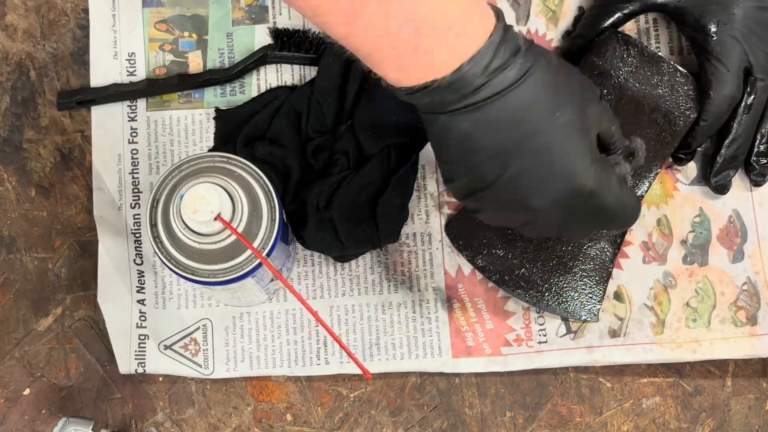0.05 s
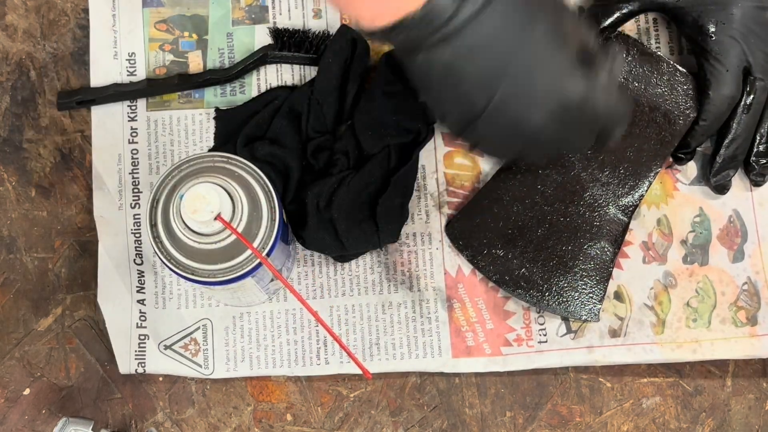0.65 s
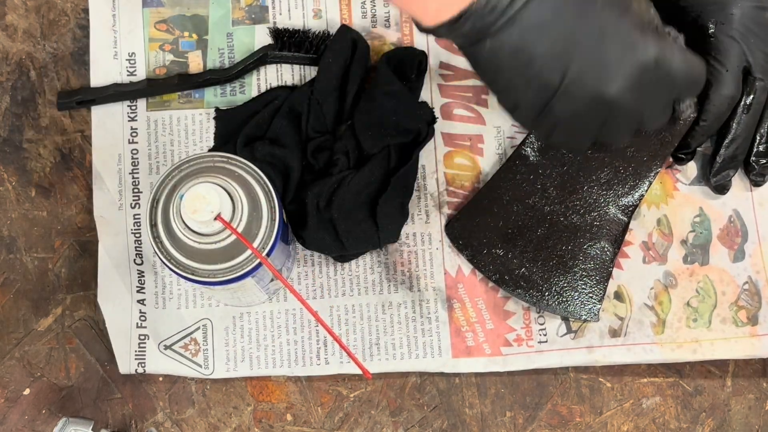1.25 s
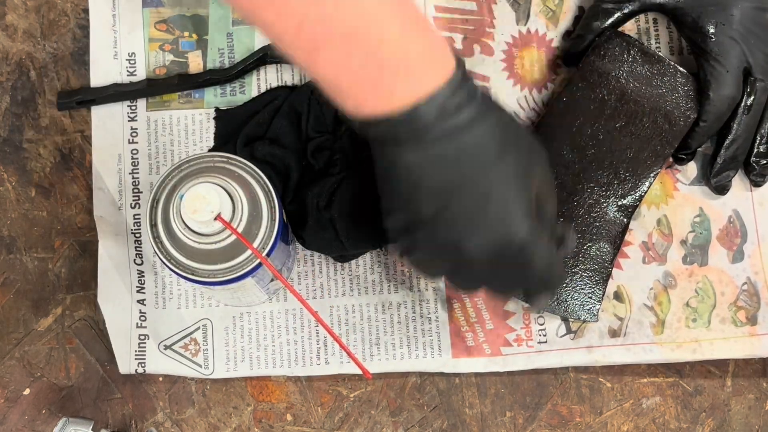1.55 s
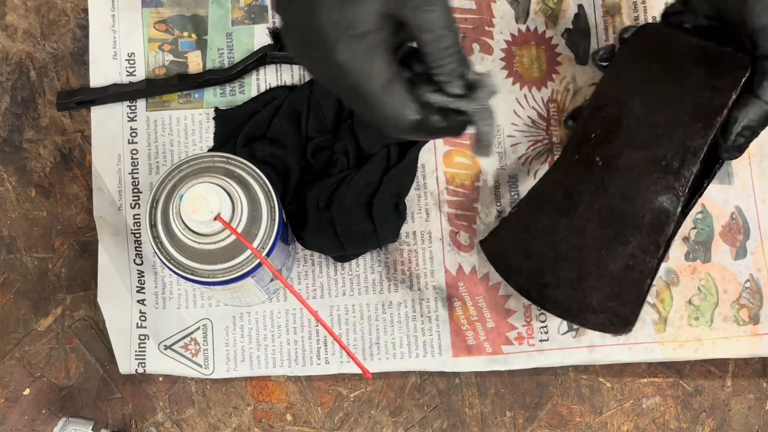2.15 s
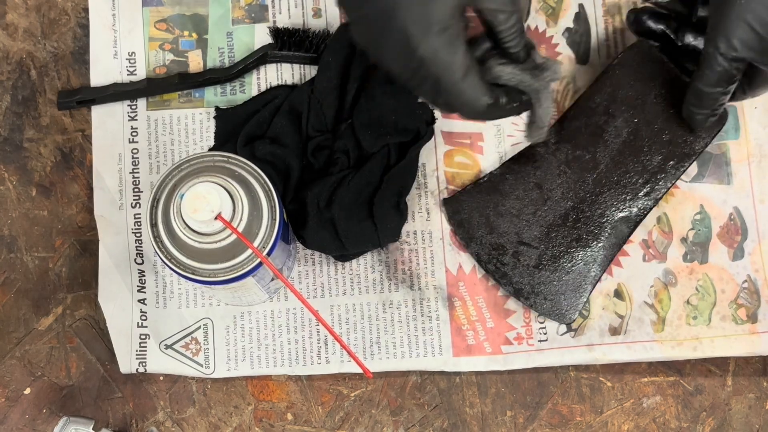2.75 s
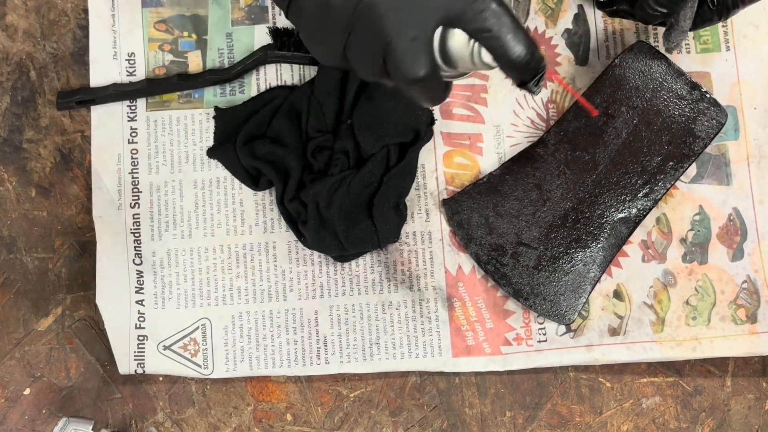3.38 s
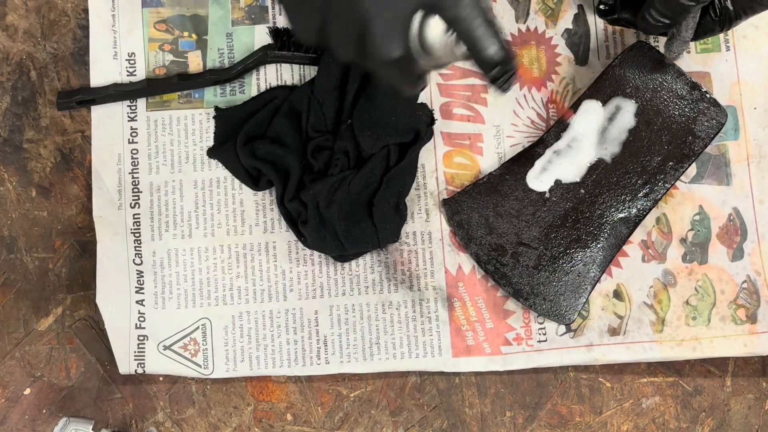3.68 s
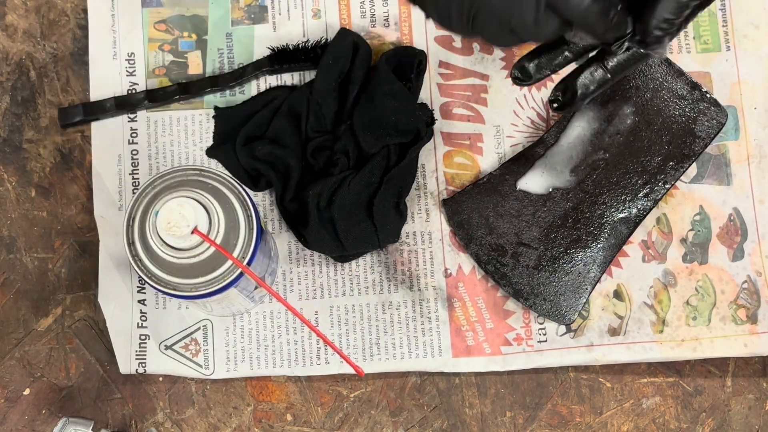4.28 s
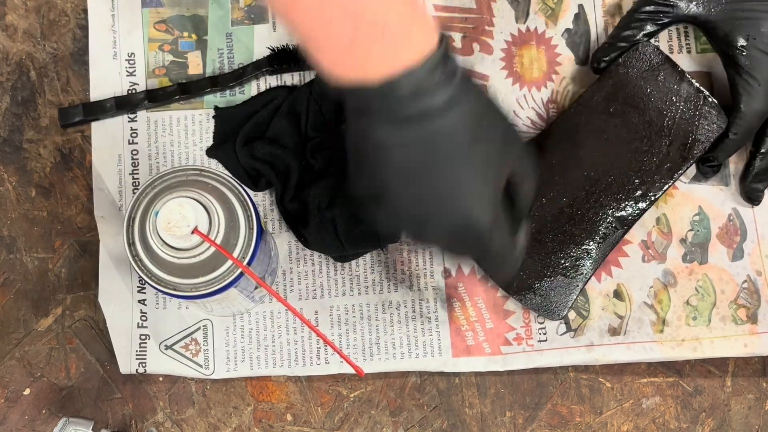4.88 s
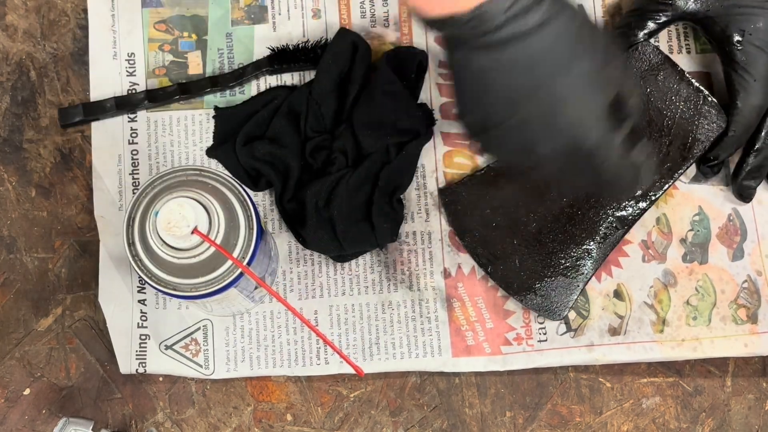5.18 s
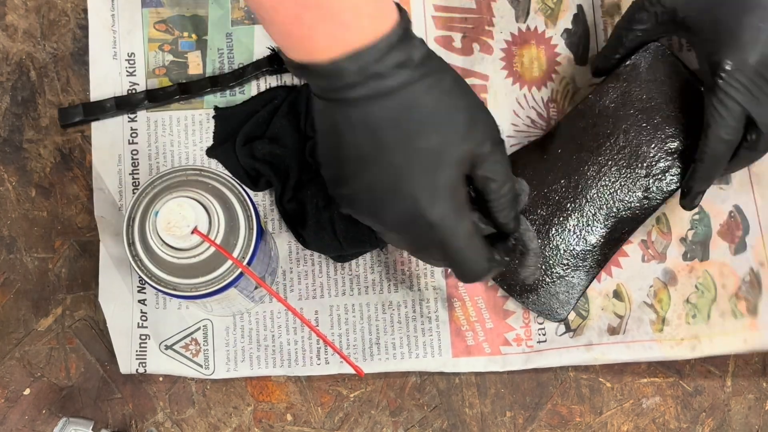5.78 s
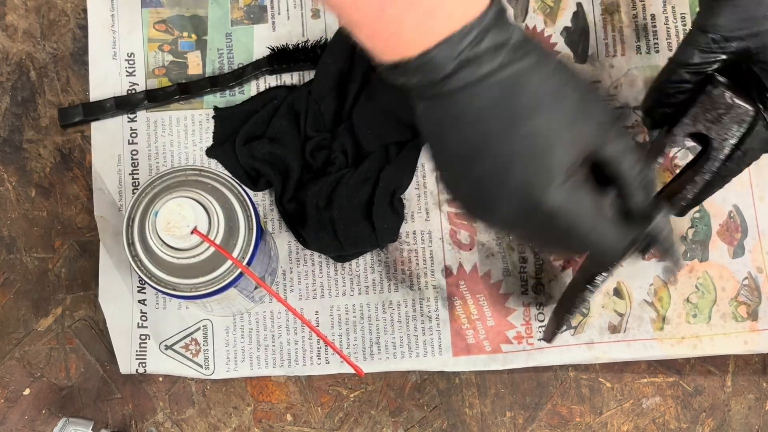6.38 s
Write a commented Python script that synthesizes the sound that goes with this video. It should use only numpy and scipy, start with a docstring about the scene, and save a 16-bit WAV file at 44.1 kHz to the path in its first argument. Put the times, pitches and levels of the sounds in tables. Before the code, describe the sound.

Close by, in a small workshop with a humming fan, a cloth rubs rapidly back and forth over oily steel. Newspaper and gloves rustle, and the axe head bumps on the wooden bench as it is turned over. Midway, a spray can gives one short, spluttering hiss and is put down. More brisk rubbing follows, with a few dull knocks, fading to faint wipes.

```python
"""A rag scrubs an oily steel axe head on newspaper on a wooden bench: stick-slip friction makes a hiss
that follows each stroke and faintly excites the steel's modes. Gloves tick and crinkle. The head scrapes
over the paper and is turned over, each impact ringing the bench. A spray can is lifted, squirts foam in
a turbulent jet and is set down; the scrubbing goes on. A small workshop rumbles and a fan hums."""
import sys
import numpy as np
from scipy import signal
from scipy.fft import rfft, irfft
from scipy.io import wavfile
from scipy.ndimage import uniform_filter1d, map_coordinates

SR = 44100
rng = np.random.default_rng(int(sys.argv[2]) if len(sys.argv) > 2 else 0)


def unload_wav(signal):
    """Save mono or channel-first audio to the path in sys.argv[1] as 16-bit WAV at rate SR, clipped to [-1, 1]."""
    wavfile.write(
        sys.argv[1],
        SR,
        np.round(np.clip(np.atleast_2d(signal).T, -1, 1) * 32767).astype(np.int16),
    )


N = 292383
TIME = np.arange(N) / SR
BINS = np.fft.rfftfreq(N, 1 / SR)
TURNED_S, VALVE_SHUT_S = 2.36, 3.645  # the head is turned over; the squirt is released

# impacts of axe head and can: (time [s], force level [dB], contact hardness [Hz], low cutoff [Hz])
AXE_IMPACTS = [(1.906, -16, 162, 91), (2.061, -28, 770, 400), (2.077, -24.5, 724, 393),
               (2.3635, 0.5, 622, 210), (2.65, -20.5, 195, 90), (2.7345, -2.5, 373, 120),
               (2.7651, -2, 241, 284), (4.6361, -5, 344, 238), (4.814, -10, 363, 141),
               (5.2844, -18.5, 312, 50), (5.555, -16, 330, 154), (5.865, -21, 190, 131)]
CAN_IMPACTS = [(3.757, -32.5, 1810, 680), (3.773, -44, 1600, 600), (3.9268, -10, 760, 290),
               (3.937, -36, 450, 250)]
# spectra of coarse friction and of fine crinkling: (frequency [Hz], relative level [dB])
DRAG_SPECTRUM = [(300, 0.5), (900, -9.5), (1500, 1), (2100, -3), (2600, -2), (3100, 1), (3600, 1.5),
                 (4400, -2.5), (5600, -3.5), (8000, -4), (16000, -31)]
CRINKLE_SPECTRUM = [(1000, -30), (3500, -1.5), (6500, 1), (9000, 2), (12000, 0.5), (16000, -1.5)]


def amp(db):
    """Amplitude ratio of a level in decibels."""
    return 10 ** (np.asarray(db) / 20)


def unit(x):
    """Normalisation to rms 1."""
    return x / np.sqrt(np.mean(x ** 2) + 1e-20)


def read(points, hz):
    """Interpolation on a log-frequency axis."""
    f, value = np.transpose(points)
    return np.interp(np.log(hz + 1), np.log(f + 1), value)


def add(mix, s, sound):
    """Superposition of a sound on the mix at time s."""
    at = round(s * SR)
    sound = sound[max(-at, 0):]
    part = mix[max(at, 0):][:len(sound)]
    part += sound[:len(part)]


def colour(x, spectrum):
    """Spectral shaping, at rms 1."""
    return unit(irfft(rfft(x) * amp(read(spectrum, BINS)), N))


def drift(hz):
    """Random fluctuation: low-pass noise of rms 1."""
    return unit(irfft(rfft(rng.standard_normal(N)) / (1 + (BINS / hz) ** 4), N))


def grains(per_s, spread_db):
    """Shot noise: a Poisson train of impulses of random size."""
    size = amp(spread_db * np.minimum(rng.exponential(1, N), 5))
    return unit(rng.standard_normal(N) * size * (rng.random(N) < per_s / SR))


def place(x, left_db):
    """Direction by a level difference between the channels."""
    return x * amp(np.array([[left_db], [-left_db]]) / 2)


def swing(length_s):
    """Reciprocating motion: the hand is fastest near mid-stroke and slowest at the turns."""
    u = np.linspace(0, 1, max(round(length_s * SR), 8))
    return unit(0.19 + abs(np.sin(np.pi * u ** 0.99)) ** 1.13)


def surface_db(s):
    """Lubrication sets the drag at time s: the wiped side, then the drier side, then fresh oil."""
    wiped_db, dry_db, oiled_db = 0, 4.5, -3
    return oiled_db if s > VALVE_SHUT_S else dry_db if s > TURNED_S else wiped_db


def strokes():
    """Friction envelopes: hiss follows the hand's speed, and drag grows as a weaker power of it."""
    # runs of equal strokes: (start [s], end [s], strokes [count], hiss level [dB], swell over run [dB])
    runs = [(-0.045, 0.15, 3, -53.5, 2), (0.149, 0.782, 10, -57, -2), (0.782, 1.196, 5, -56, 3),
            (1.2, 1.278, 1, -48, 0), (1.281, 1.414, 1, -47.5, 1), (1.417, 1.563, 2, -48, -4.5),
            (1.56, 1.799, 3, -54.5, 1.5), (1.801, 1.968, 2, -54, -5.5), (2.383, 2.563, 2, -49, 7),
            (2.605, 2.677, 1, -56.5, -5), (4.484, 4.696, 2, -52, 1.5), (4.705, 5.128, 5, -50, 6),
            (5.123, 5.195, 1, -57, 3), (5.191, 5.451, 4, -52, -1), (5.451, 5.687, 3, -49.5, 1.5),
            (5.68, 5.955, 2, -53.5, -12.5), (6.042, 6.16, 2, -64, -1), (6.37, 6.46, 1, -62.5, 0),
            (6.568, 6.63, 1, -65, -1)]
    easy_hiss_db, easy_drag_db, drag_exponent = -53, -58.5, 0.67
    hiss, drag = np.zeros(N), np.zeros(N)
    for start, end, count, run_db, swell_db in runs:
        length = (end - start) / count
        levels = run_db + swell_db * np.linspace(-.5, .5, count) + 0.2 * rng.standard_normal(count)
        for k, db in enumerate(levels):
            stroke = amp(db) * swing(length)
            effort = (stroke / amp(easy_hiss_db)) ** drag_exponent
            add(hiss, start + k * length, stroke)
            add(drag, start + k * length, amp(easy_drag_db + surface_db(start)) * effort)
    return uniform_filter1d(hiss, size=160), uniform_filter1d(drag, size=160)


def reflection(x, delay_s, db):
    """Comb filtering: a sound interferes with an echo whose path changes as the hand moves."""
    return x + amp(db) * map_coordinates(x, [(TIME - delay_s) * SR], order=3, mode="wrap")


def steel_ring(hiss):
    """Forced resonance: friction drives the head's modes, whose balance shifts as it is tipped up."""
    # steel modes: (frequency [Hz], bandwidth [Hz], drive lying flat [dB], drive tipped up [dB])
    modes = [(5330, 22, -3, 16), (8100, 31, 3, -3), (13530, 34, 8, 2), (13800, 80, -3, 15.5),
             (14700, 60, 4, 0)]
    tipping_s = [5.26, 6.2]
    out = np.zeros(N)
    for hz, width, flat_db, tipped_db in modes:
        drive_db = np.interp(TIME, tipping_s, [flat_db, tipped_db])
        drive = rng.standard_normal(N) * hiss * amp(drive_db + 3 * drift(hz=6))
        out += signal.lfilter(*signal.iirpeak(hz, hz / width, fs=SR), drive)
    return out


def rag():
    """Stick-slip friction: fibres catch on pitted steel, and the push shakes the bench."""
    # spectra of slipping fibres and of the pushed bench: (frequency [Hz], relative level [dB])
    fibre_spectrum = [(1000, -13), (3000, -31), (5000, -2), (6800, -1.5), (9500, 2.5), (13000, 4),
                      (15000, -1), (16000, 5.5)]
    shove_spectrum = [(40, -81), (90, -11), (135, 1), (180, 6.5), (260, -3), (400, -24), (800, -32),
                      (2000, -64)]
    hiss, drag = strokes()
    pressure = amp(1.2 * drift(hz=70))
    fibres = colour(grains(per_s=14000, spread_db=2.5), fibre_spectrum) * hiss
    coarse = colour(grains(per_s=12000, spread_db=1), DRAG_SPECTRUM) * drag * amp(-1 + 2.4 * drift(hz=25))
    slip = (fibres + coarse) * pressure
    # the bench reflects the hiss
    slip = reflection(slip, delay_s=.00036 * amp(2 * drift(hz=7)), db=-12)
    slip = reflection(slip, delay_s=.0016 * amp(.6 * drift(hz=4)), db=-10)
    shove = colour(rng.standard_normal(N), shove_spectrum) * drag * amp(-0.5)
    return slip + amp(1) * steel_ring(hiss) + shove


def glove_ticks():
    """Adhesion: oily rubber sticks and lets go in loose clusters of faint ticks."""
    return colour(grains(per_s=500, spread_db=3.5), CRINKLE_SPECTRUM) * amp(-79 + 5.5 * drift(hz=4))


def workshop():
    """Partly coherent background noise: rumble and air, with a fan's tones common to both channels."""
    # spectra of rumble and air noise: (frequency [Hz], relative level [dB])
    rumble_spectrum = [(25, -55), (50, -85), (75, -11), (100, -3), (125, -2.5), (170, 2.5), (205, -13),
                       (255, -8), (380, -19), (520, -22.5), (630, -19), (850, -23.5), (1300, -31.5),
                       (2500, -49.5)]
    air_spectrum = [(300, -11), (1000, 4), (1800, 3.5), (2600, -0.5), (3600, -6), (6000, -10.5),
                    (10000, -14), (16000, -25)]
    # left-right likeness of the noise: (frequency [Hz], correlation [0-1])
    correlation = [(100, 0.97), (600, 0.69), (1200, 0.16), (2500, 0.53), (5000, 1), (15000, 1)]
    # fan tones: (frequency [Hz], level [dB], rms frequency deviation [Hz])
    fan_tones = [(720.3, -52.5, 0.38), (117.8, -53.5, 2.81), (621, -69, 5.23)]

    def noise(power_share):
        rumble = amp(-48 + 2 * drift(hz=7.6)) * colour(rng.standard_normal(N), rumble_spectrum)
        air = amp(-66) * colour(rng.standard_normal(N), air_spectrum)
        return irfft(np.sqrt(power_share) * rfft(rumble + air), N)

    alike = read(correlation, BINS)
    mid, side = noise((1 + alike) / 2), noise((1 - alike) / 2)
    hum = np.zeros(N)
    for hz, db, waver in fan_tones:
        phase = 2 * np.pi * np.cumsum(hz + waver * drift(hz=6.63)) / SR
        hum += amp(db) * np.sqrt(2) * np.sin(phase)
    return place(np.array([mid + side, mid - side]) + hum, left_db=-.3)


def edge_scrape():
    """Sliding friction: the head's edge drags over the newspaper."""
    # slides: (start [s], end [s], level [dB])
    slides = [(1.84, 2.23, -66), (2.327, 2.492, -57), (2.53, 2.74, -57), (6.18, 6.463, -72)]
    # steel on paper: (frequency [Hz], relative level [dB])
    spectrum = [(1000, -6), (2200, -19), (2900, -2), (3700, 2), (4600, -8), (7000, -10), (14000, -12.5)]
    envelope = np.zeros(N)
    for start, end, db in slides:
        add(envelope, start, amp(db) * swing(end - start))
    return colour(grains(per_s=6500, spread_db=0), spectrum) * envelope * amp(4.15 * drift(hz=49))


def tap(db, hz, t60):
    """Damped oscillation of one mode, roughened by a shorter scuff of noise."""
    t = np.arange(SR // 10) / SR
    scuff = rng.standard_normal(len(t)) * amp(-100 * t / t60)
    ring = np.sin(2 * np.pi * hz * t) * amp(-60 * t / t60) * np.minimum(t * hz / 3, 1)
    return amp(db) * (amp(-3.5) * ring + amp(-7) * scuff)


def clicks():
    """Contact transients: light taps during the work, and the nozzle snapping down before the squirt."""
    # taps of can, steel and gloves: (time [s], level [dB], frequency [Hz], T60 [s])
    taps = [(1.902, -31.5, 12150, 0.0094), (2.367, -21, 7100, .007), (2.597, -44, 3700, .02),
            (3.558, -38, 11600, 0.012), (3.821, -46, 1300, .028), (3.958, -38, 3000, .007),
            (5.825, -41, 3380, .018), (6.002, -49, 5820, 0.024), (6.039, -48, 2600, .037)]
    # nozzle modes: (frequency [Hz], level [dB], T60 [s])
    nozzle_modes = [(3620, -47, .026), (6500, -41.5, .021), (8900, -58, .028)]
    press_s = 3.356
    out = np.zeros(N)
    for s, db, hz, t60 in taps:
        add(out, s, tap(db, hz, t60))
    add(out, press_s, sum(tap(db, hz, t60) for hz, db, t60 in nozzle_modes))
    return out


def knocks(impacts, modes):
    """Modal response to impact: a harder contact excites higher modes."""
    t, out = np.arange(SR // 2) / SR, np.zeros(N)
    # neighbouring modes swing in antiphase, so the thump takes a few milliseconds to build
    body = sum((-1) ** k * amp(db - 60 * t / t60) * np.sin(2 * np.pi * hz * t)
               for k, (hz, db, t60) in enumerate(modes))
    for s, db, hard_hz, low_hz in impacts:
        thump = signal.sosfilt(signal.butter(3, hard_hz, fs=SR, output="sos"), body)
        thump = signal.sosfilt(signal.butter(2, low_hz, "high", fs=SR, output="sos"), thump)
        add(out, s, amp(db) * thump)
    return out


def paper_crunch():
    """Crushing noise: each impact compresses the newspaper, louder the stronger and harder it is."""
    # crushed paper: (frequency [Hz], relative level [dB])
    spectrum = [(500, 12.5), (1500, 11), (3500, 6), (7500, 3.5), (10000, 5), (16000, -10)]
    reference_hz, db_per_octave, t60 = 383, 11, 0.13
    t, envelope = np.arange(SR // 4) / SR, np.zeros(N)
    for s, force_db, hard_hz, _ in AXE_IMPACTS + CAN_IMPACTS:
        onset_db = force_db - 44 + db_per_octave * np.log2(hard_hz / reference_hz)
        add(envelope, s, amp(onset_db - 60 * t / t60))
    return envelope * colour(rng.standard_normal(N), spectrum)


def grip_rustle():
    """Buckling: rubber and newspaper crinkle as the grip shifts, building to a snap and dying away."""
    # rustles: (peak time [s], duration [s], hiss level [dB], crackle level [dB])
    rustles = [(2.08, 0.062, -48, -47.5), (2.327, 0.083, -59.5, -61), (2.742, 0.056, -52.5, -48),
               (2.811, 0.034, -72, -61), (2.93, .07, -50, -56), (3.127, 0.043, -79, -63),
               (3.229, 0.086, -60.5, -74), (3.758, 0.04, -52, -56), (3.925, 0.015, -46, -46),
               (4.125, 0.11, -68, -69), (4.258, 0.048, -53, -63), (4.306, 0.079, -50, -72)]
    ends_db, rise_share = -20.5, 0.63
    hiss, crackle = np.zeros(N), np.zeros(N)
    for s, length, hiss_db, crackle_db in rustles:
        u = np.linspace(0, 1, round(length * SR))
        shape = amp(np.interp(u, [0, rise_share, 1], [ends_db, 0, ends_db]))
        add(hiss, s - rise_share * length, amp(hiss_db) * shape)
        add(crackle, s - rise_share * length, amp(crackle_db) * shape)
    fine = colour(grains(per_s=6600, spread_db=2), CRINKLE_SPECTRUM) * hiss * amp(-1.5)
    coarse = colour(grains(per_s=2700, spread_db=3), DRAG_SPECTRUM) * crackle
    return (fine + coarse) * amp(1.9 * drift(hz=110))


def burst(start_s, rise_s, release_s, fade_db_per_s):
    """Flow envelope: linear rise, hold, and exponential decay after the release."""
    rise = np.clip((TIME - start_s) / rise_s, 0, 1)
    return rise * amp(-fade_db_per_s * np.clip(TIME - release_s, 0, 1))


def spray():
    """Turbulent jet noise: gas hisses through the open valve, and foam leaves the straw in one gush."""
    # spectra of the gas jet and of spluttering foam: (frequency [Hz], relative level [dB])
    jet_spectrum = [(2000, -30), (4500, -7.5), (7000, -8), (8700, 0.5), (10500, 0), (12200, -2),
                    (13500, -3), (16000, -10)]
    foam_spectrum = [(500, -17), (2000, -16), (3000, -14), (3600, 3), (4500, -1.5), (6000, -0.5),
                     (9000, -3), (16000, -34)]
    open_s, sag_db_per_s = 3.41, 22  # the flow weakens while the nozzle is held
    valve = burst(open_s, rise_s=0.006, release_s=VALVE_SHUT_S, fade_db_per_s=330)
    valve *= amp(-sag_db_per_s * np.clip(TIME - open_s, 0, 1))
    gush = burst(start_s=3.46, rise_s=0.026, release_s=3.486, fade_db_per_s=246)
    jet = colour(grains(per_s=18000, spread_db=2.5), jet_spectrum) * (amp(-53.5) + amp(-46.5) * gush)
    foam = colour(grains(per_s=2700, spread_db=-1.5), foam_spectrum) * (amp(-62) + amp(-46) * gush)
    return (jet + foam) * valve * amp(2.2 * drift(hz=110))


def room(x):
    """Diffuse reverberation: a short tail, different in each ear, lasting longest in the midrange."""
    # reverberation time: (frequency [Hz], T60 [s])
    decay_times = [(100, 0.091), (300, 0.16), (1000, 0.25), (4000, 0.1), (15000, 0.093)]
    build_s = .02
    hz, t, noise = signal.stft(rng.standard_normal((2, SR // 2)), SR, nperseg=256)
    envelope = amp(-60 * t / read(decay_times, hz)[:, None]) * np.minimum(t / build_s, 1)
    tail = signal.istft(noise * envelope, SR, nperseg=256)[1]
    return signal.fftconvolve(x, tail / np.linalg.norm(tail[0]), axes=1)[:, :N]


def scene():
    """Superposition of the direct sound of the work, its reverberation and the background."""
    # modes of the bench under the axe, and of the can on the bench: (frequency [Hz], level [dB], T60 [s])
    bench_modes = [(93, -17, 0.42), (128.1, -8.5, 0.16), (183.8, -2.5, 0.15), (260.7, 1.5, 0.1),
                   (301, -18.5, .15), (344.3, -12.5, 0.13), (479, -5.5, 0.12), (482, -15, 0.17),
                   (595, 6, 0.037), (702.5, -11.5, 0.15), (795, -5, 0.048), (848, -8.5, 0.099),
                   (941, -5, 0.074), (1157, -8, 0.11), (1305, -5, 0.066), (1520, -13.5, 0.2),
                   (1745, -8.5, 0.078), (1973, -8.5, 0.11)]
    can_modes = [(140, -3, 0.13), (252, 0.5, 0.1), (292.6, 1.5, 0.12), (367, 1.5, 0.062), (449, 4, 0.057),
                 (520, 2.5, 0.053), (595, -3.5, 0.082), (660, -8, 0.061), (727, 3.5, 0.054),
                 (940, -5, 0.048), (1100, -1.5, 0.043), (1250, -7, 0.056), (1450, -4.5, 0.026)]
    hisses = rag() + grip_rustle() + glove_ticks() + spray() + edge_scrape()
    axe = place(knocks(AXE_IMPACTS, bench_modes), left_db=-1) * amp(-7.5)
    can = place(knocks(CAN_IMPACTS, can_modes), left_db=-2.3) * amp(-7)
    blows = axe + can + paper_crunch() + clicks()
    return hisses + blows + room(amp(-32.5) * hisses + amp(-22) * blows) + workshop()


def record(dry):
    """Phase difference and band limiting at two closely spaced microphone ports."""
    # lead of the left port over the right: (frequency [Hz], phase [rad])
    port_lead = [(100, 0.026), (500, -0.21), (780, 0.63), (1600, -1.1), (2000, -0.84), (2900, -0.54),
                 (4000, 0), (10000, 0), (11300, -1.04), (12700, -0.22)]
    low_cut_hz, high_cut_hz = 65, 15800
    phase_shift = np.exp(1j * np.array([[1], [-1]]) * read(port_lead, BINS) / 2)
    bass_rolloff = BINS ** 2 / np.hypot(BINS ** 2, low_cut_hz ** 2)
    heard = irfft(rfft(dry) * phase_shift * bass_rolloff, N)
    lowpass = signal.firwin(511, high_cut_hz, window=("kaiser", 9), fs=SR)
    return signal.oaconvolve(heard, lowpass[None], "same", axes=1)


dry = scene()
out = record(dry)
unload_wav(out)
```